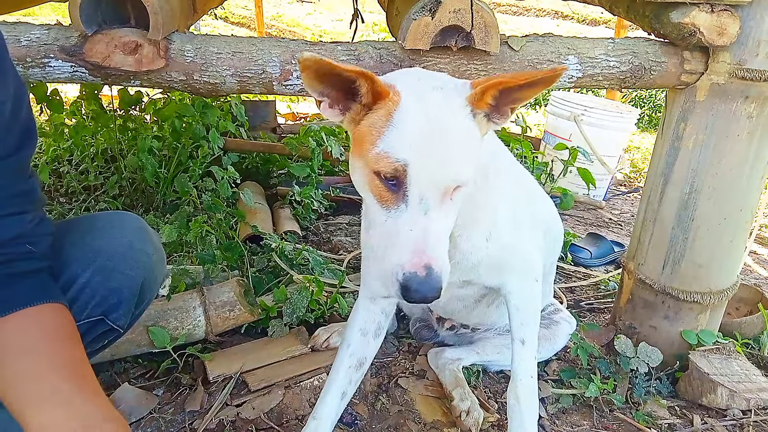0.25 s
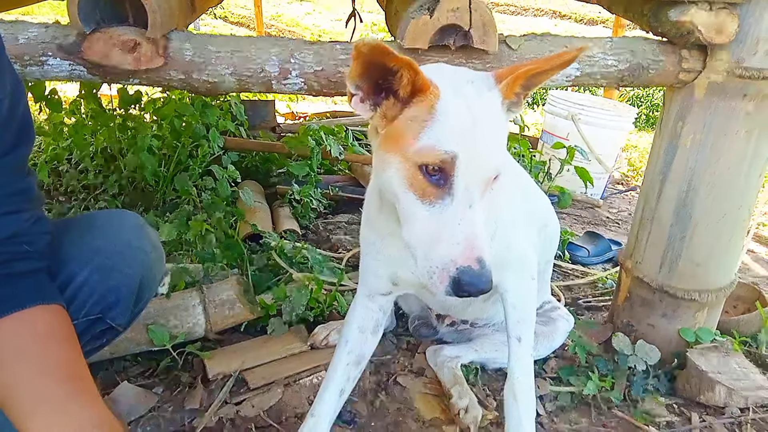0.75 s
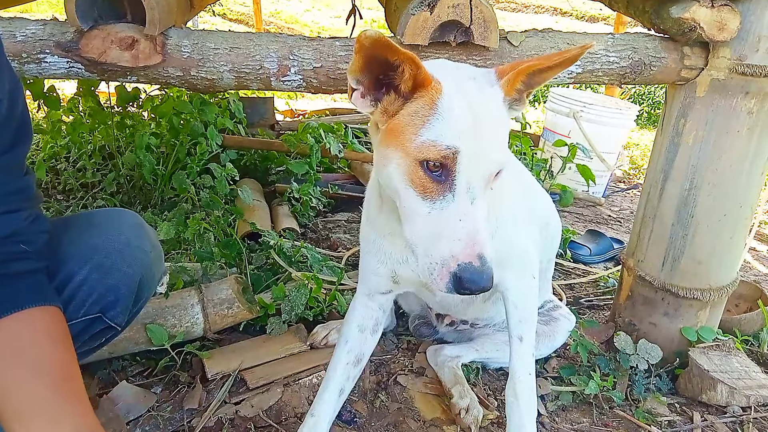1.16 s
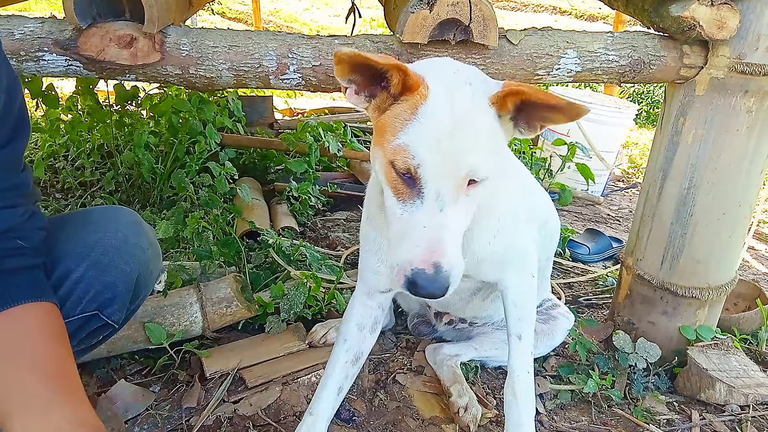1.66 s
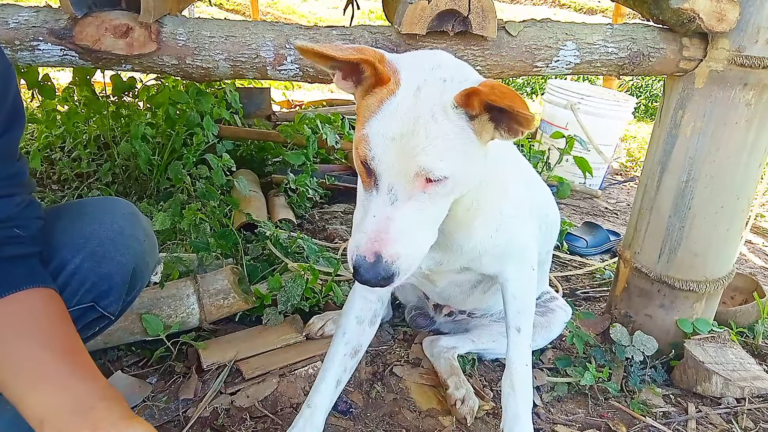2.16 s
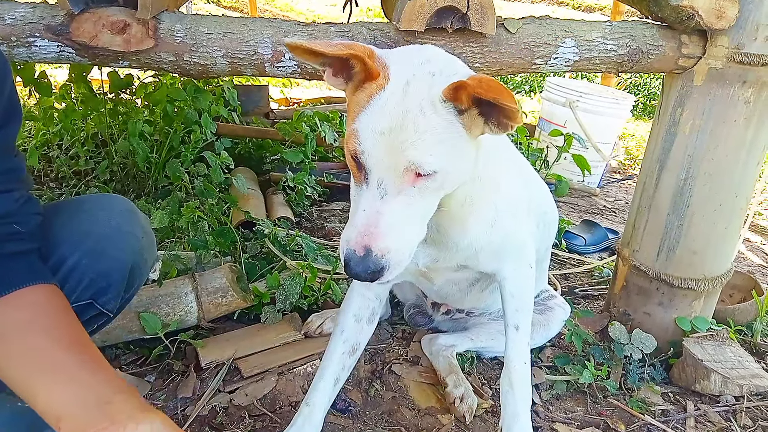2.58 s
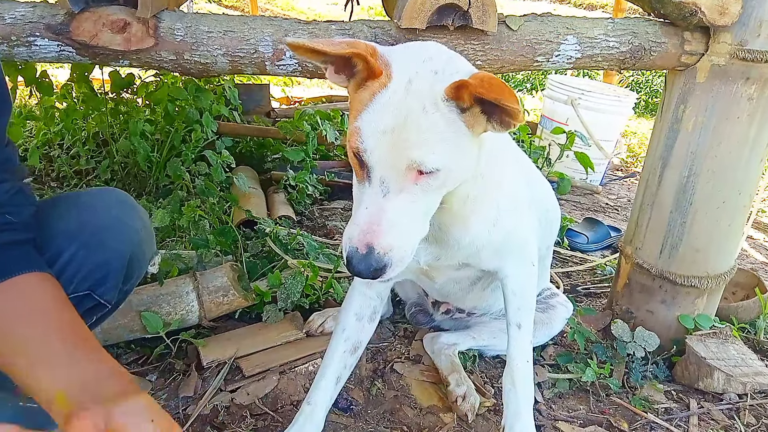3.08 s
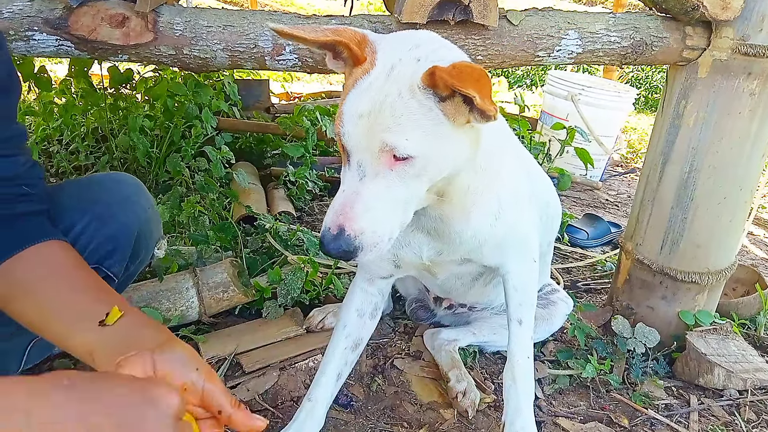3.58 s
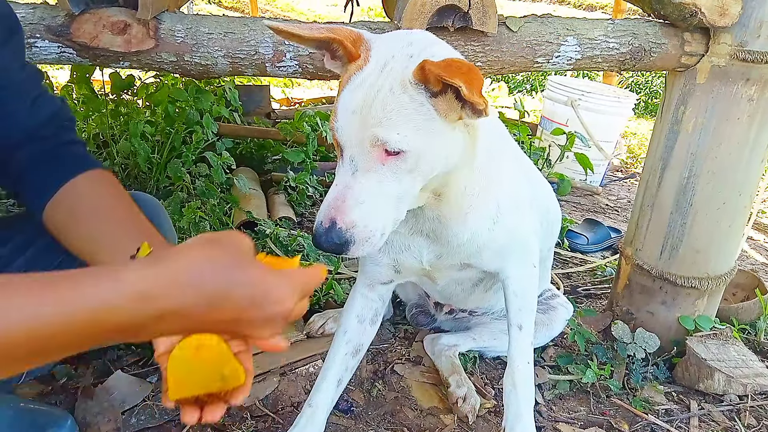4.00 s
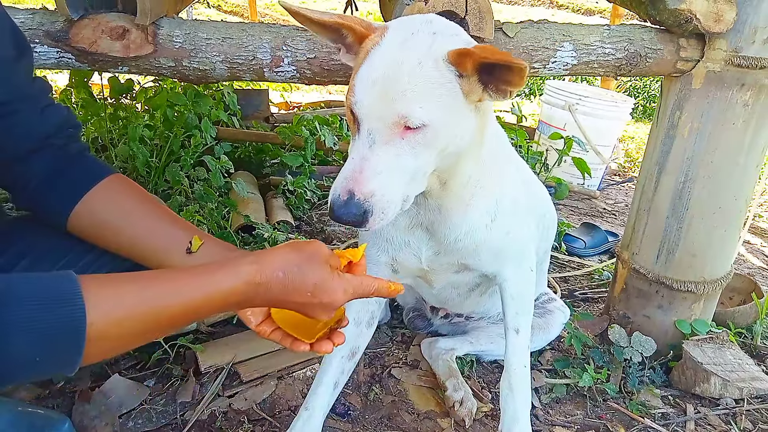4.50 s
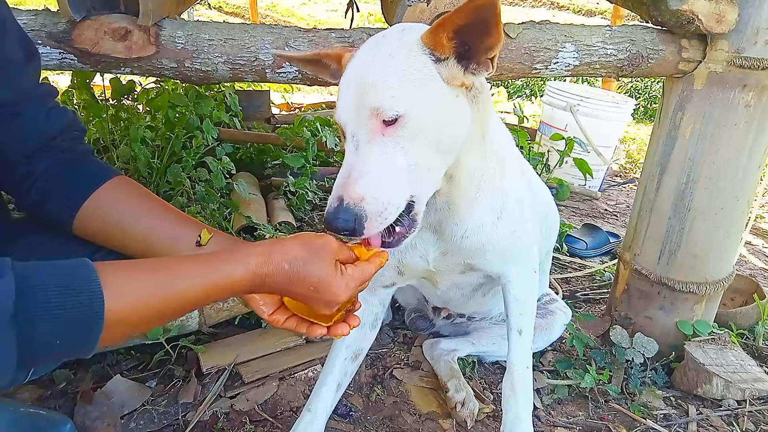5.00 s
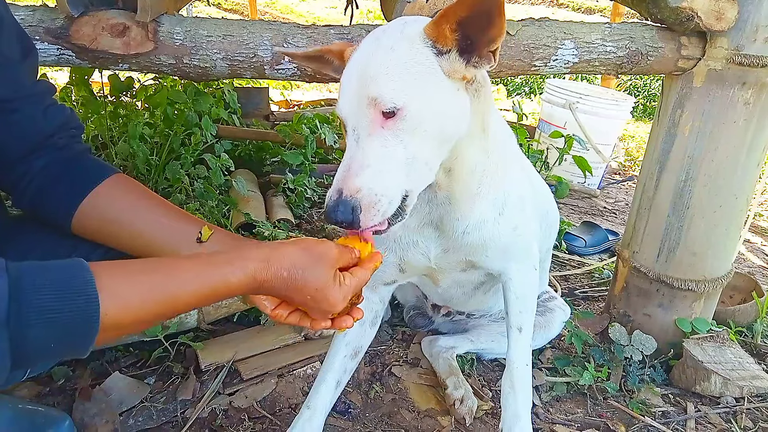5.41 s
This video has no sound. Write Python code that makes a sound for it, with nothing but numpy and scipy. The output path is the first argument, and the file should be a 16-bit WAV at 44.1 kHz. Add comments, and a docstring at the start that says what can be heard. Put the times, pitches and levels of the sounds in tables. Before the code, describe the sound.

Close mono microphone outdoors: faint saliva crackles and lip pops near the start, high gliding whistles from bushes, then ground knocks and one bright, dry clack like a knife set on a board, followed by scraping and a weaker clack. Afterwards quiet air, distant calls, wet mouth pops and a brief thin twitter while the dog eats.

```python
"""A quiet farmyard at one microphone, over the noise of leaves and insects and the notes of far birds and fowl.
A dog licks its lips in small crackles of saliva, then ringing mouth cavities pop; a small bird whistles very
high in the bushes on gliding sines. Beside the dog something hard, probably the fruit knife, is put down: two soft
knocks and a hard-edged one ring the ground, a sharp clack, a scrape and a lighter clack ring board and blade.
Last come more wet pops and smacks as the dog takes fruit from a hand; wobbling twitters sound early and late."""
import sys
import numpy as np
from scipy import signal
from scipy.fft import rfft, irfft, next_fast_len
from scipy.io import wavfile
from scipy.ndimage import uniform_filter1d

SR = 44100
rng = np.random.default_rng(int(sys.argv[2]) if len(sys.argv) > 2 else 0)


def wav_out(sig):
    """Save sig, one row per channel (or a flat mono array), as 16-bit PCM at SR to the path in sys.argv[1]."""
    wavfile.write(sys.argv[1], SR, np.round(np.clip(np.atleast_2d(sig).T, -1, 1) * 32767).astype(np.int16))


N = 249165  # length of the scene [samples]
SHORT = 8192  # length of one brief sound [samples]
T = np.arange(SHORT) / SR  # its time axis [s]

# All levels are relative: spectra and mixing gains act on them later.
# Wet pops of tongue and lips: (time [s], middle cavity pitch [Hz], peak level [dB], decay [s])
POP_EVENTS = [(1.7985, 1204, -54, .003), (1.8, 1850, -62, .002), (1.873, 3190, -56, 0.0026),
              (1.8765, 780, -59, .004), (1.8825, 673, -50.5, 0.0072), (1.901, 684, -57, .005),
              (2.2465, 713, -50, 0.0039), (4.6904, 768, -44, 0.0049), (4.791, 3870, -55.5, 0.0028),
              (5.592, 710, -54, .005), (5.609, 1035, -50, 0.0029)]
# Clearest smacks of saliva and moist fruit:
# (time [s], level [dB], centre [Hz], width [octaves], decay [s])
SMACK_EVENTS = [(.831, -58.5, 4830, 0.16, 0.013), (1.1675, -49, 2020, 0.77, 0.004),
                (1.1835, -48, 5000, 1.4, .0025), (1.799, -49, 1500, 1.3, 0.0028),
                (1.825, -58, 3750, 0.14, 0.0054), (1.8738, -52, 3220, 0.2, 0.0083),
                (1.877, -54, 590, 1.3, 0.017), (2.248, -61, 650, 0.67, 0.0039),
                (2.3755, -49, 865, 0.36, .005), (2.388, -60.5, 835, 0.22, 0.032),
                (1.865, -64, 11900, 0.37, 0.026), (2.09, -72, 12000, .4, .03),
                (3.126, -52, 10500, 1.2, .01), (3.686, -53.5, 4500, 0.64, 0.003),
                (4.063, -58, 9300, 0.25, 0.011), (4.112, -54.5, 11000, .45, .002),
                (4.654, -52.5, 4930, 0.62, .004), (4.736, -66, 12000, 0.44, 0.018),
                (4.7532, -53.5, 6500, 0.53, .0025), (5.228, -67.5, 765, .3, 0.019),
                (5.462, -59.5, 5530, .3, 0.0046), (5.609, -58, 780, 0.38, 0.025)]
# Faint saliva ticks at random moments while the dog eats
EATS_FROM_S, EATS_UNTIL_S = 5.3, 5.6
TICK_HZ, TICK_SPREAD_OCTAVES, TICK_WIDTH_OCTAVES = 7600, 0.24, 0.41
TICK_DB, TICK_DECAY_S = -68.5, 0.0026
# Soft shuffles of arm and sleeve: (time [s], length [s], level [dB], centre [Hz], width [octaves])
SLEEVE_RUBS = [(2.363, 0.29, -67, 91, 0.51), (2.6, 0.17, -71, 170, 0.63), (2.37, 0.028, -58.5, 188, 0.25),
               (3.85, 0.11, -66, 265, 0.11), (4.728, 0.069, -71, 177, 0.66), (5.593, 0.048, -65, 212, .4)]

# Knife contacts: (time [s], blow level [dB], scraping level [dB], build-up [s], decay [s],
# brightness above 3 kHz [dB per octave], low cut [Hz], ground thud level [dB], litter level [dB])
KNIFE_CONTACTS = [(2.8126, -13, -22, 0.000074, 0.0014, -2, 800, -47, -42.5),
                  (2.9, -45, -32, 0.0045, 0.0044, 0, 150, -44, -51),
                  (2.9852, -33, -34, 0.0005, 0.0053, 1.5, 756, -46, -52.5)]
# Ringing of the struck board, before it is choked: (frequency [Hz], level [dB], t60 [s])
BOARD_RESONANCES = [(960, -15.5, 0.026), (1390, -13, 0.029), (1790, -9.5, 0.028), (2120, -12.2, 0.03),
                    (2280, -8.0, 0.036), (2590, -15.3, 0.03), (3090, -7.5, 0.03), (3510, 0.5, 0.018),
                    (3890, -6.5, 0.023), (4010, -7.8, 0.021), (4430, -4, 0.026), (4610, -10.3, 0.031),
                    (4870, -2.5, 0.021), (5260, -12.8, 0.035), (5490, -13.2, 0.024), (6720, -10.0, 0.014),
                    (7750, -13.0, 0.014), (8460, -10.5, 0.016), (9100, -11.5, 0.016), (11410, -9.5, 0.011),
                    (13080, -14.3, 0.009), (14940, -9, 0.013)]
# The blade's close pair of modes: (frequency [Hz], level [dB], t60 [s])
BLADE_RESONANCES = [(2190, -29, .07), (2305, -24, .08)]
# Spectrum of the crack of the contact itself: (frequency [Hz], level [dB])
CRACK_SPECTRUM = [(100, -14.5), (450, -16.5), (830, -3.5), (1250, -8.5), (1700, -13), (2250, -7),
                  (2800, -3), (3500, -15), (4800, 1.5), (6200, -3), (8800, -6), (10400, -5), (15000, -9)]
# Two soft knocks and a hard-edged one on the ground:
# (time [s], level [dB], edge click relative to the knock [dB])
GROUND_KNOCKS = [(2.3758, -45, -28), (2.5740, -40, -42), (2.6308, -26.5, 12)]
# Ringing of the ground under a hard-edged knock: (frequency [Hz], level [dB], t60 [s])
GROUND_RESONANCES = [(87.5, -18.5, 0.11), (200, -8, 0.025), (340, -7.5, 0.034), (800, -10.5, 0.021),
                     (1090, -2.5, 0.012), (1810, -2.5, 0.0045)]
# Spectrum of the edge click: (frequency [Hz], level [dB])
EDGE_SPECTRUM = [(500, -27), (2600, -3), (3700, 3), (5300, 4.5), (6700, -5), (8800, 8), (10600, -10),
                 (13500, -2), (15500, -14)]
THUD_CLICK_DB = -10  # edge click under each knife contact, relative to its thud
# Spectrum of the dry leaf litter: (frequency [Hz], level [dB])
LITTER_SPECTRUM = [(300, -2.5), (2000, 3), (4500, 4), (6500, 0), (9000, 8.5), (10600, -7), (13500, 3),
                   (15500, -24)]
LITTER_LAG_S, LITTER_DECAY_S = 0.0089, 0.03  # litter gives way just after each contact
# Single grains of grit that snap as the knife settles: (time [s], level [dB], centre [Hz])
GRIT_SNAPS = [(2.8105, -47, 3500), (2.8665, -46, 12500), (2.8835, -38, 14000), (2.8925, -36, 3000),
              (2.8965, -32, 3200), (2.9028, -32, 4200), (2.9115, -48, 5000), (2.916, -47, 3300),
              (2.9275, -41, 12500), (2.9535, -51, 9500), (2.969, -46, 11500), (2.983, -41, 4500),
              (3.0565, -50, 14000)]
GRIT_DECAY_S, GRIT_WIDTH_OCTAVES = 0.00095, 0.55
YARD_T60_S = 0.081  # reflections from the yard

# High whistles that close in on one top pitch:
# (time [s], length [s], start pitch [Hz], pitch rise [s], swell [s], level [dB])
WHISTLE_EVENTS = [(2.202, .157, 7420, .035, 0.036, -57.5), (2.443, 0.19, 6970, .043, 0.033, -56.5),
                  (2.713, 0.185, 7680, .06, .06, -60.5)]
WHISTLE_TOP_HZ = 8940
# Bouts of thin twittering deeper in the bushes: (time [s], length [s], level [dB], centre [Hz])
TWITTER_BOUTS = [(-.04, 0.065, -61.5, 8620), (0.178, 0.022, -59, 8600), (0.62, 0.18, -63, 8400),
                 (4.506, 0.19, -69, 8000), (5.386, 0.03, -60.5, 8550), (5.446, 0.11, -61.5, 8290)]
TWITTER_FALL = 0.055  # share of its pitch that each bout sinks by
# Gliding calls of far birds: (time [s], length [s], start pitch [Hz], end pitch [Hz], level [dB])
FAR_CALLS = [(1.05, 0.021, 1990, 1990, -66), (1.138, 0.025, 3020, 2950, -61),
             (1.285, 0.015, 2550, 2650, -65), (1.36, 0.012, 2460, 2430, -67),
             (1.74, 0.054, 1466, 1460, -69), (1.875, 0.069, 1500, 1516, -71),
             (2.022, 0.027, 1720, 1704, -65.5), (2.055, 0.055, 2968, 2950, -71),
             (2.075, 0.033, 1860, 1950, -66), (2.19, 0.057, 1527, 1680, -65.5),
             (2.29, 0.083, 1770, 1780, -70), (2.425, 0.054, 1840, 1780, -65),
             (2.55, 0.0425, 1570, 1570, -62), (3.018, 0.094, 1784, 1722, -66),
             (3.34, 0.125, 1495, 1440, -72), (3.6, 0.15, 1760, 1740, -76), (3.72, .06, 1616, 1630, -71),
             (3.86, 0.094, 1430, 1340, -72), (3.9, .085, 1665, 1625, -74), (4.45, 0.046, 1910, 1950, -69),
             (4.612, 0.071, 1816, 1945, -58.5), (4.85, 0.039, 1775, 1758, -61),
             (4.962, 0.055, 1832, 1730, -59.5), (5.475, 0.034, 2000, 1980, -66.5)]
# Level hoots of far fowl: (time [s], pitch [Hz], level [dB])
FOWL_HOOTS = [(.63, 930, -68.5), (1.335, 822, -68), (2.06, 990, -78), (2.26, 967, -70.5), (3.32, 940, -70),
              (3.79, 778, -67.5), (4.315, 951, -67), (4.77, 942, -74)]
HOOT_S = 0.126
ARCH_SHARE = 0.015  # arch in the pitch of each far call and hoot, as a share
# The farthest fowl and birds: (pitch [Hz], pitch spread [share], level [dB])
FARTHEST_CALLS = [(782, 0.0616, -77), (942, 0.03, -78), (1740, 0.1, -80)]

# Spectrum of the outdoor air: (frequency [Hz], level per Hz [dB])
AIR_SPECTRUM = [(25, -18), (45, -8), (72, 4), (130, -0.5), (200, -3), (280, -3.5), (400, -6.5), (720, -6.5),
                (1000, -6.5), (1250, -9.5), (1700, -8), (2100, -10), (2800, -11), (4100, -5.5), (6600, -10),
                (7600, -6)]
# Continuation of it, the high insect hiss: (frequency [Hz], level per Hz [dB])
INSECT_SPECTRUM = [(8100, -6), (8850, -1), (9800, -10.5), (11300, -20.5), (14000, -21), (15600, -24.5)]
# Level of the air over time: (time [s], level [dB])
AIR_LEVEL_TRACK = [(0.0, -67.5), (2.2, -67), (2.52, -65), (3.04, -64), (3.23, -67), (3.78, -67),
                   (3.94, -65.5), (4.12, -67), (4.31, -67), (4.66, -66), (5.25, -68), (5.65, -65)]
# Gain of the air's upper mids over time: (time [s], level [dB])
MIDS_LEVEL_TRACK = [(0, 1.5), (.75, -1), (1.05, 1.5), (1.5, -3), (1.7, -4.5), (1.85, 2), (1.98, -5.5),
                    (2.1, -1), (3.75, -0.5), (3.95, 2), (4.3, -1.5), (4.55, 0), (4.7, 1.5), (5.65, -2)]
TOP_HZ = 15700  # upper limit of the microphone


def mouth(open_s=0.0025, glide=0.01, grain_db=3, yard_db=-9, yard_t60=0.17):
    """Parting tongue and lips ring small cavities; films of saliva burst in tiny crackles."""
    out = np.zeros(N)
    for s, hz, db, decay in POP_EVENTS:
        # the pitch lifts as the cavity opens
        track = hz * (1 + glide * (.5 - np.exp(-T / decay)))
        phase = 2 * np.pi * np.cumsum(track) / SR
        envelope = (1 - np.exp(-(T / open_s) ** 2)) * np.exp(-T / decay)
        add(out, s, amp(db) * np.sin(phase) * envelope / envelope.max())

    ticks = []
    for s in spread_times(EATS_FROM_S, EATS_UNTIL_S, count=7):
        db = TICK_DB + 2 * rng.standard_normal()
        hz = TICK_HZ * 2 ** (TICK_SPREAD_OCTAVES * rng.standard_normal())
        ticks.append((s, db, hz, TICK_WIDTH_OCTAVES, TICK_DECAY_S))
    for s, db, hz, octaves, decay in list(SMACK_EVENTS) + ticks:
        burst = crackle(np.exp(-T / decay), grain_db)
        add(out, s, amp(db) * colour(burst, hump(hz, octaves)))
    return out + amp(yard_db) * scatter(out, yard_t60)


def shuffle(flutter_db=-0.5):
    """The arm reaches down and comes back with the fruit: short, nearly steady bands of rubbing noise."""
    out = np.zeros(N)
    for s, length, db, hz, octaves in SLEEVE_RUBS:
        size = int(length * SR)
        rub = colour(rng.standard_normal(size), hump(hz, octaves))
        rub = rub * amp(flutter_db * walk(38.0, size=size))
        add(out, s, amp(db) * rub * signal.windows.tukey(size))
    return out


def knife(choke_s=0.0091, grain_db=4, rub_db=-3, bounce_s=.009, bounce_db=-22, bounce_t60=0.037,
          near_db=-21, near_t60=0.078, yard_db=-32):
    """Each contact is a blow that rings board and blade, in a rush of tiny impacts that ring the board too."""
    out, lead = np.zeros(N), SHORT // 8
    # the knife lands flat and chokes the wood, which gives off little bass; the steel sings on a little longer
    wood = ring(BOARD_RESONANCES) * np.exp(-(T / choke_s) ** 2)
    body = wood + ring(BLADE_RESONANCES)
    t = T - lead / SR  # the rush builds up before the blow at t = 0
    for s, blow_db, scrape_db, rise, decay, tilt, low_hz, *_ in KNIFE_CONTACTS:
        rush = crackle(np.exp(np.minimum(t / rise, -t / decay)), grain_db)
        crack = colour(rush, lambda f: through(CRACK_SPECTRUM)(f) + tilt * np.log2(np.maximum(f, 3000) / 3000))
        rub = signal.fftconvolve(rush, wood / np.linalg.norm(wood))[:SHORT]
        contact = amp(scrape_db) * (crack + amp(rub_db) * rub) / np.hypot(1, amp(rub_db))
        add(contact, lead / SR, amp(blow_db) * body)
        add(out, s - lead / SR, high_pass(contact, low_hz, order=4))

    # a bright cluster of reflections comes back from the posts a moment later
    posts = np.zeros(N)
    bright = np.diff(out, prepend=0) + out / 2
    add(posts, bounce_s, amp(bounce_db) * scatter(bright, bounce_t60, delay=0.00043))
    near = amp(near_db) * scatter(out, near_t60, damp_hz=10000)
    yard = amp(yard_db) * scatter(out, YARD_T60_S, damp_hz=9000)
    return out + posts + near + yard


def knocks(click_lead_s=0.00018, yard_db=-21):
    """An edge click, faint or hard, then the dull ring of the ground; the knife's contacts thud in it too."""
    out, clicks = np.zeros(N), np.zeros(N)
    edge_click = colour(signal.unit_impulse(SHORT), through(EDGE_SPECTRUM))
    thuds = [(s, thud_db, THUD_CLICK_DB) for s, *_, thud_db, litter_db in KNIFE_CONTACTS]
    for s, db, click_db in list(GROUND_KNOCKS) + thuds:
        # without a hard edge the push is slower and the upper modes stay quiet
        softness = np.clip(-click_db / 40, 0, 1)
        modes = [(hz, mode_db - 8 * softness * np.log2(max(hz / 400, 1)), t60)
                 for hz, mode_db, t60 in GROUND_RESONANCES]
        add(out, s, amp(db) * ring(modes))
        add(clicks, s - click_lead_s, amp(db + click_db) * edge_click)
    return out + clicks + amp(yard_db) * scatter(out, YARD_T60_S)


def litter(grain_db=0.0):
    """Dry leaves give way in a fine, fading rustle just after each contact; grit snaps around them."""
    leaves, grit = np.zeros(N), np.zeros(N)
    for s, *_, db in KNIFE_CONTACTS:
        add(leaves, s + LITTER_LAG_S, amp(db) * crackle(np.exp(-T / LITTER_DECAY_S), grain_db))
    for s, db, hz in GRIT_SNAPS:
        snap = crackle(np.exp(-T / GRIT_DECAY_S), grain_db)
        add(grit, s, amp(db) * colour(snap, hump(hz, GRIT_WIDTH_OCTAVES)))
    return colour(leaves, through(LITTER_SPECTRUM)) + grit


def small_bird(waver=0.003, onset_waver=0.011, flutter_db=1.8, echo_db=2.5, fade_db=-12, rasp=0.017,
               foliage_t60=0.48):
    """Thin whistles that swell in with a rasp, rise and level off, smeared by the foliage."""
    direct, far = np.zeros(N), np.zeros(N)
    for s, length, start_hz, rise_s, swell_s, db in WHISTLE_EVENTS:
        t = np.arange(int(length * SR)) / SR
        climb = np.exp(-t / rise_s)
        hz = WHISTLE_TOP_HZ + (start_hz - WHISTLE_TOP_HZ) * climb
        swell = np.minimum(t / swell_s, 1)
        # the pitch is rough on the way up and steadies at the top
        hz = hz * (1 + (waver + onset_waver * climb) * walk(500, size=len(t)))
        gain = amp(db + flutter_db * walk(174, size=len(t)))
        add(direct, s, swell ** 2 * gain * note(hz, edge=0.14))
        # the raspy rising start of each whistle echoes most
        blurred = note(hz * (1 + rasp * np.sqrt(climb) * walk(1200, size=len(t))), edge=0.1)
        add(far, s, amp(echo_db + fade_db * t / length) * swell * gain * blurred)
    return direct + scatter(far, foliage_t60, delay=0.0014)


def twitters(swing=0.048, swing_rate=600, foliage_t60=0.38):
    """Fast wobbling notes that sink a little and arrive only as echoes from the foliage."""
    out = np.zeros(N)
    for s, length, db, hz in TWITTER_BOUTS:
        size = int(length * SR)
        fall = TWITTER_FALL * np.linspace(.5, -.5, size)
        track = hz * (1 + fall + swing * walk(swing_rate, size=size))
        add(out, s, amp(db) * note(track, edge=0.32))
    return scatter(out, foliage_t60)


def far_birds(waver=0.0093, flutter_db=5.0, flutter_rate=35, direct_db=-3, echo_db=-7.0,
              echo_waver=0.035, echo_t60=0.62):
    """Short gliding calls and level hoots from far off, broken by the air and trailing a blurred echo."""
    direct, far = np.zeros(N), np.zeros(N)
    hoots = [(s, HOOT_S, hz, hz, db) for s, hz, db in FOWL_HOOTS]
    for s, length, start_hz, end_hz, db in list(FAR_CALLS) + hoots:
        size = int(length * SR)
        arch = ARCH_SHARE * (.5 - np.linspace(-1, 1, size) ** 2)
        hz = np.linspace(start_hz, end_hz, size) * (1 + arch + waver * walk(270, size=size))
        gain = amp(db) * unit(amp(flutter_db * walk(flutter_rate, size=size)))
        add(direct, s, gain * note(hz, edge=0.22))
        blurred = note(hz * (1 + echo_waver * walk(286, size=size)), edge=0.3)
        add(far, s, gain * blurred)
    return amp(direct_db) * direct + amp(echo_db) * scatter(far, echo_t60)


def chorus(count=64, length_s=0.087, glide=0.033, waver=0.022, echo_t60=0.35):
    """The farthest fowl and birds: faint overlapping notes at random, blurred by distance."""
    out, size = np.zeros(N), int(length_s * SR)
    for hz, spread, db in FARTHEST_CALLS:
        times = spread_times(0, N / SR, count)
        for s, (pitch, slope, loud) in zip(times, rng.standard_normal((count, 3))):
            slide = glide * slope * np.linspace(-.5, .5, size)
            track = hz * (1 + spread * pitch + slide + waver * walk(202, size=size))
            add(out, s, amp(db + loud) * note(track, edge=0.91))
    return scatter(out, echo_t60)


def air(air_db=5.0, flicker_db=0.5, mids_hz=1900, mids_octaves=0.57):
    """Leaves and insects hiss over a low rumble of wind, as shaped noise whose upper mids rise and sink."""
    t = np.arange(N) / SR
    level_db = np.interp(t, *np.transpose(AIR_LEVEL_TRACK))
    mids_gain = amp(np.interp(t, *np.transpose(MIDS_LEVEL_TRACK)))
    hiss = unit(colour(rng.standard_normal(N), through(AIR_SPECTRUM + INSECT_SPECTRUM)))
    f = np.maximum(np.fft.rfftfreq(N, 1 / SR), 1)
    mids = irfft(rfft(hiss) * amp(hump(mids_hz, mids_octaves)(f)), N)
    hiss = hiss + (mids_gain - 1) * mids
    return hiss * amp(air_db + level_db + flicker_db * walk(15))


def scatter(x, t60, delay=0.0032, damp_hz=20000):
    """Diffuse reflections from leaves, posts and ground, at unit energy, duller above damp_hz."""
    t = np.arange(SR // 2) / SR
    # silent until the delay, full at twice the delay
    tail = rng.standard_normal(len(t)) * amp(-60 * t / t60) * np.clip(t / delay - 1, 0, 1)
    tail = colour(tail, lambda f: -10 * np.log10(1 + np.square(np.square(f / damp_hz))))
    return signal.fftconvolve(x, tail / np.linalg.norm(tail))[:len(x)]


def crackle(envelope, grain_db):
    """A rush of noise, grainier the higher grain_db, that carries the energy of its envelope."""
    grains = rng.standard_normal(SHORT) * amp(grain_db * walk(1500, size=SHORT)) * envelope
    return unit(grains) * np.sqrt(np.mean(envelope ** 2))


def ring(modes):
    """Response of a set of decaying modes; neighbours swing in opposite senses."""
    return sum((-1) ** k * amp(db) * np.sin(2 * np.pi * hz * T) * amp(-60 * T / t60)
               for k, (hz, db, t60) in enumerate(modes))


def note(hz, edge):
    """A sine on a pitch track, faded in and out over a share of its length."""
    sine = np.sqrt(2) * np.sin(2 * np.pi * np.cumsum(hz) / SR)
    return sine * signal.windows.tukey(len(hz), np.clip(edge, 0, 1))


def walk(rate, size=N):
    """Smooth random drift, spread near 1, with about rate new values a second."""
    k = max(int(SR / rate), 1)
    steps = np.repeat(rng.standard_normal(size // k + 2), k)
    return unit(uniform_filter1d(steps, k))[:size]


def spread_times(start, end, count):
    """Random moments, one in each equal part of a stretch of time."""
    return start + (end - start) * (np.arange(count) + rng.random(count)) / count


def colour(x, db_at):
    """Causal (minimum-phase) filter of unit power gain; db_at gives its shape over frequency."""
    size = 2 * next_fast_len(len(x))
    gain = amp(db_at(np.maximum(np.fft.rfftfreq(size, 1 / SR), 1)))
    cepstrum = irfft(np.log(unit(gain) + 1e-6))
    # folding the cepstrum forward in time makes the filter causal
    cepstrum[1:size // 2] *= 2
    cepstrum[size // 2 + 1:] = 0
    return irfft(rfft(x, size) * np.exp(rfft(cepstrum)))[:len(x)]


def through(points):
    """Spectrum through (frequency [Hz], level [dB]) points on a log-frequency axis."""
    hz, db = np.transpose(points)
    return lambda f: np.interp(np.log(f), np.log(hz), db)


def hump(hz, octaves):
    """Spectrum of one broad resonance, 12 dB down at twice the given width to either side."""
    return lambda f: -40 * np.log10(1 + (np.log2(f / hz) / octaves / 2) ** 2)


def high_pass(x, hz, order):
    """Weaken what lies below a frequency (Butterworth filter)."""
    return signal.sosfilt(signal.butter(order, hz, "high", fs=SR, output="sos"), x)


def add(track, s, sound):
    """Mix a sound into a track at a time in seconds."""
    i = int(round(s * SR))
    sound, i = sound[max(-i, 0):], max(i, 0)
    track[i:i + len(sound)] += sound[:len(track) - i]


def unit(x):
    """Scale to rms 1."""
    return x / np.sqrt(np.mean(x ** 2))


def amp(db):
    """Decibels to gain."""
    return 10 ** (np.asarray(db) / 20)


def scene():
    """All sources, near and far, at one microphone."""
    handling = knife() + knocks() + litter() + shuffle()
    birds = small_bird() + twitters() + far_birds() + chorus()
    return (handling + mouth() + birds + air())[None]


def record(dry):
    """The microphone drops the deepest bass and cuts the top."""
    thin = high_pass(dry, 50, order=2)
    return signal.sosfilt(signal.ellip(10, .2, 70, TOP_HZ, fs=SR, output="sos"), thin)


dry = scene()
out = record(dry)
wav_out(out)
```